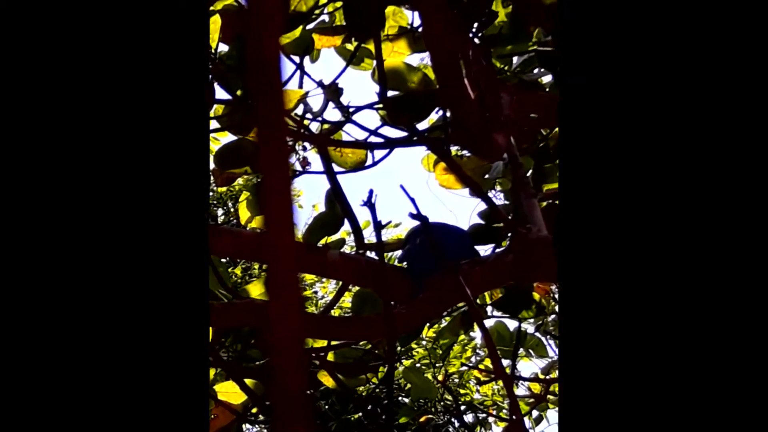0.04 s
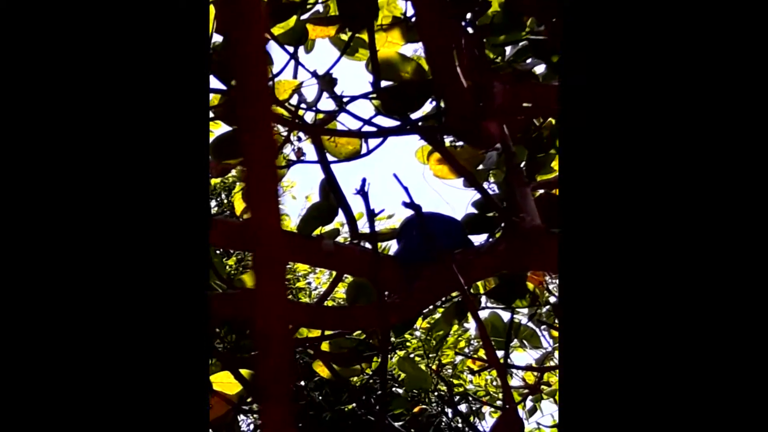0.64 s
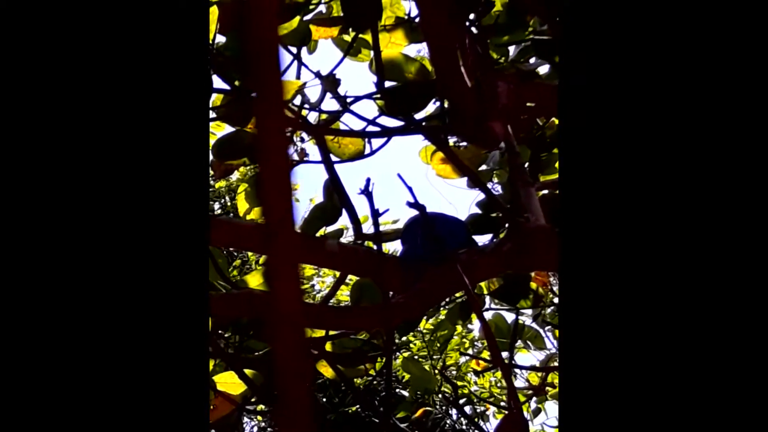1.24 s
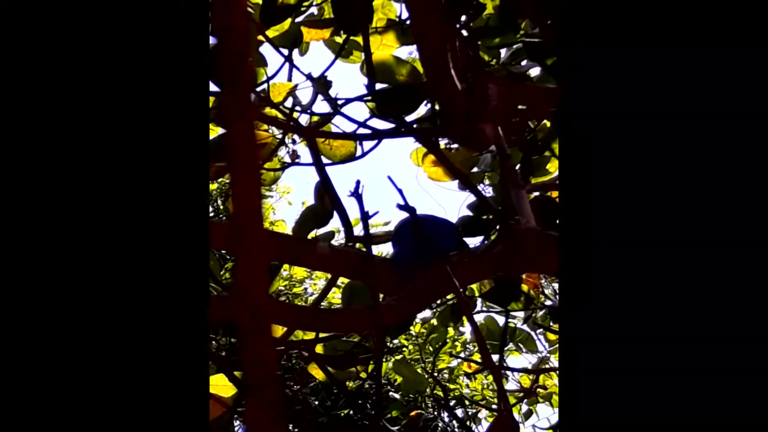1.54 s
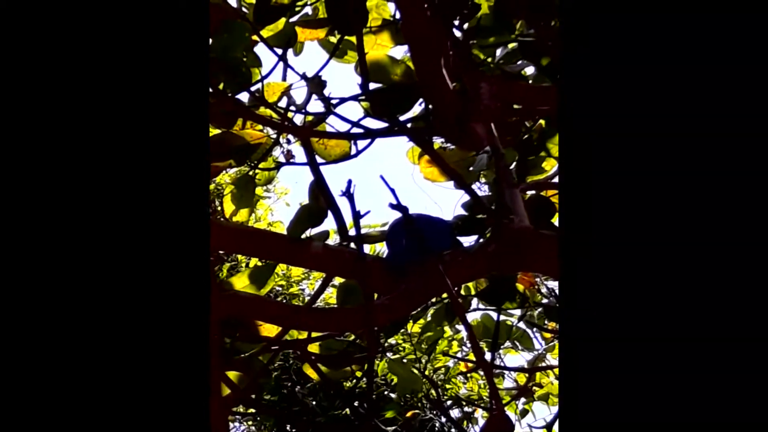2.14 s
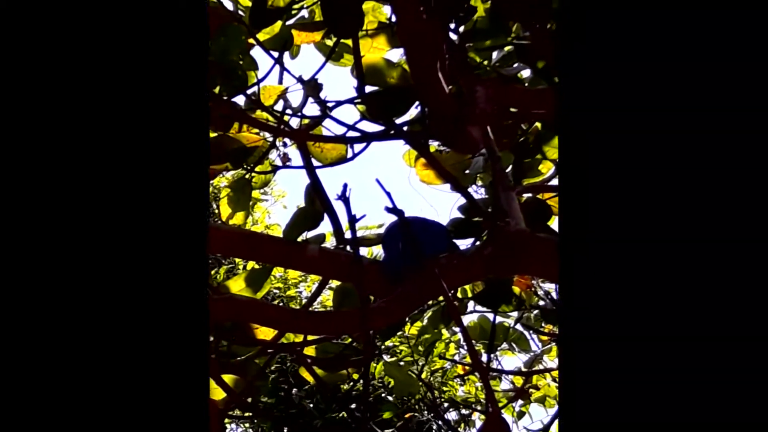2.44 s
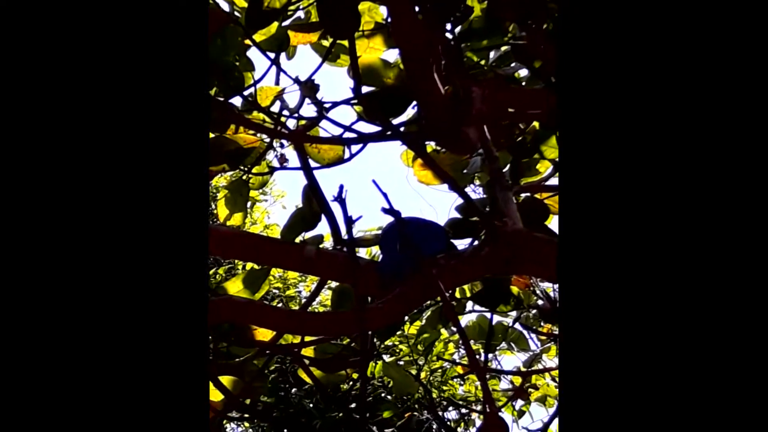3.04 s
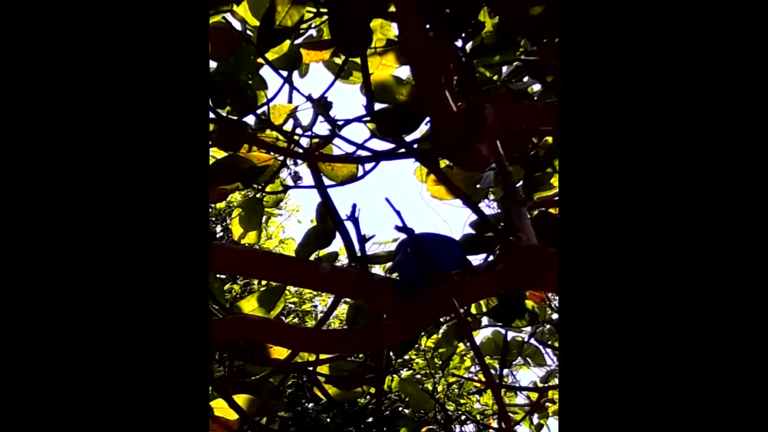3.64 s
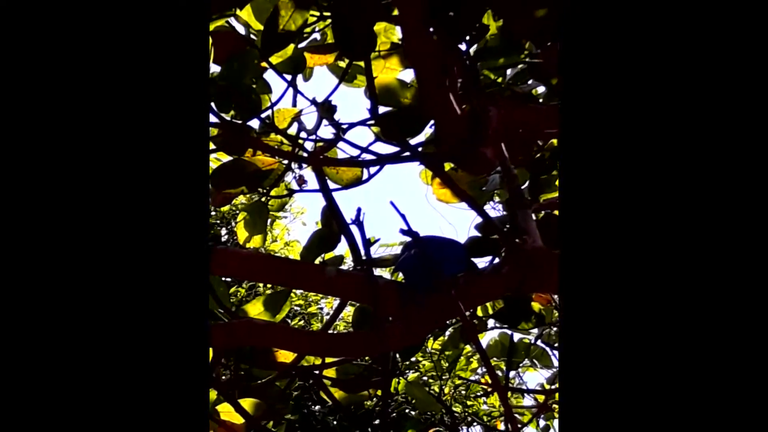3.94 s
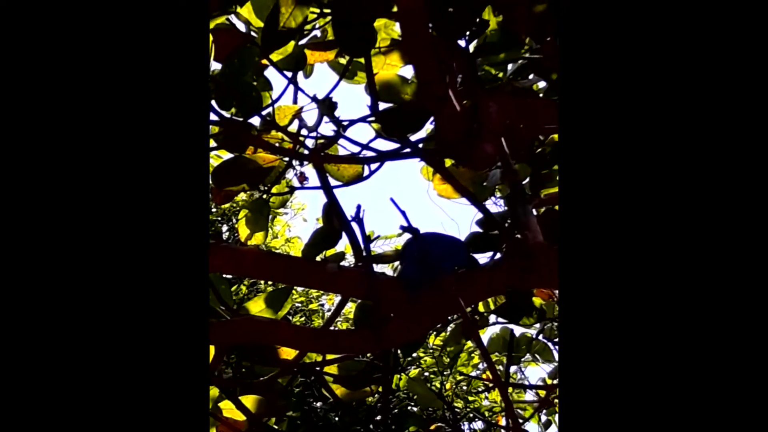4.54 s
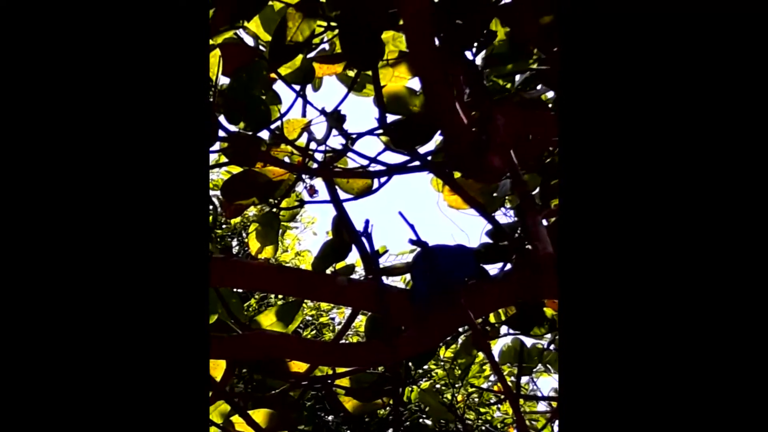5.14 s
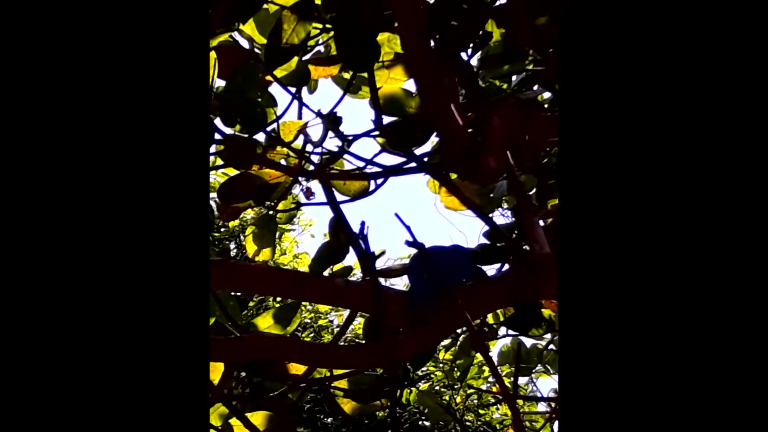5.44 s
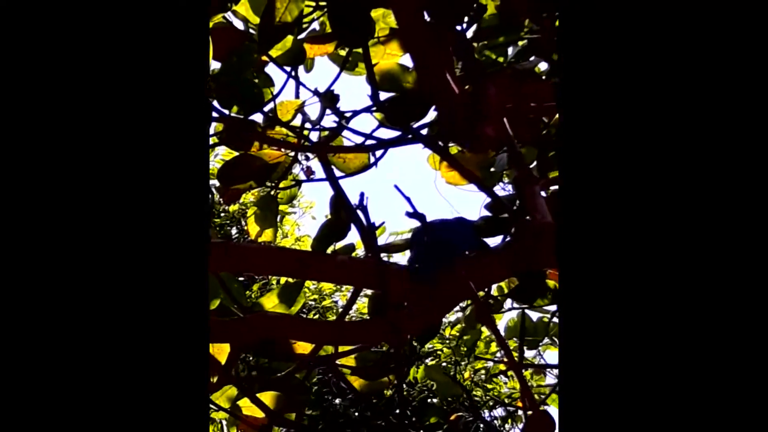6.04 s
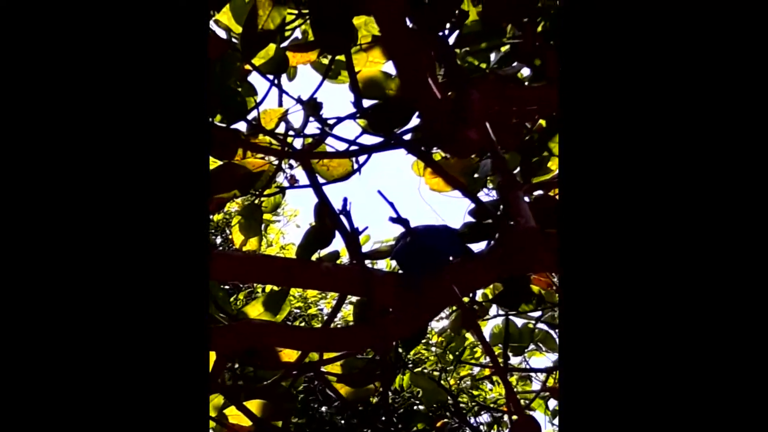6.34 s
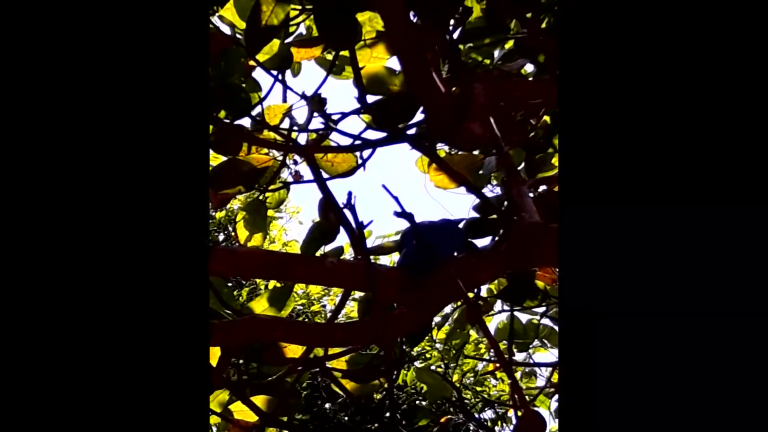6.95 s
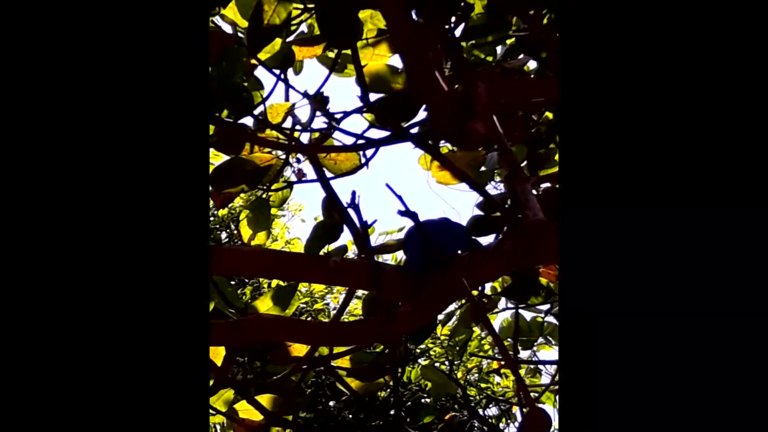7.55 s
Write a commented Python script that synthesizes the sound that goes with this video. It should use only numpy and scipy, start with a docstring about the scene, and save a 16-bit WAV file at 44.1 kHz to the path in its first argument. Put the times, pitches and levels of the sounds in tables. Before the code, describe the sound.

Under a tree, high insects throb steadily over a faint drone of far traffic. Small birds whistle in the distance, twigs tick and a nearer bird chirps briefly. Then a bird overhead gives two loud calls, each rising and dropping away, rich in overtones, slightly overloading the microphone and echoing through the wood. After the second call, a hoarse bird answers twice from farther off.

```python
"""Under a tree: far traffic drones and insects throb high up throughout. The echo of an earlier koel
call fades; small birds whistle far off. Twigs tick from 0.4 s, a bush cricket rasps from 1.2 s, and a
nearer bird slurs and chirps at 2.3 s. At 3.5 s and 6 s a koel overhead calls: its syrinx tone rises and
falls, overtones sweeping through the throat's resonances, overloads the microphone and echoes in the
wood. Around the second call a rumble swells, a hoarse bird answers twice, the nearer bird sings again."""
import sys
import numpy as np
from scipy import signal
from scipy.fft import rfft, irfft, next_fast_len
from scipy.io import wavfile
from scipy.ndimage import map_coordinates

SR = 44100
rng = np.random.default_rng(int(sys.argv[2]) if len(sys.argv) > 2 else 0)


def inscribe(sig):
    """Save sig as 16-bit PCM at rate SR to the path in sys.argv[1].

    A 1-D sig is mono; a 2-D sig holds one channel per row.
    Samples are clipped to [-1, 1] before scaling.
    """
    pcm = np.round(np.clip(np.atleast_2d(sig).T, -1, 1) * 32767)
    wavfile.write(sys.argv[1], SR, pcm.astype(np.int16))


N = 344421
T = np.arange(N) / SR
TOP_HZ = 15900


def amp(db):
    """Decibels to gain."""
    return 10 ** (np.asarray(db) / 20)


def unit(x):
    """x at rms 1."""
    return x / np.sqrt(np.mean(x ** 2) + 1e-20)


def along(points, hz):
    """(Hz, value) points read on a log axis."""
    f, v = np.transpose(points)
    return np.interp(np.log(hz + 1), np.log(f + 1), v)


def wobble(knots_per_s, t=T):
    """Smooth random curve over times t."""
    return map_coordinates(rng.standard_normal(int(N * knots_per_s / SR) + 4), [t * knots_per_s])


def filtered(x, response):
    """x through a gain given as a function of Hz."""
    size = next_fast_len(N + 8192)
    return irfft(rfft(x, size) * response(np.fft.rfftfreq(size, 1 / SR)), size)[:N]


def noise(spectrum):
    """Noise of rms 1 shaped by (Hz, dB) points."""
    return unit(filtered(rng.standard_normal(N), lambda hz: amp(along(spectrum, hz))))


def jitter(width_hz):
    """Random flutter of rms 1 below width_hz."""
    return unit(filtered(rng.standard_normal(N), lambda hz: 1 / (1 + (hz / width_hz) ** 4)))


def phase_of(hz):
    """Running phase of a moving pitch."""
    return 2 * np.pi * np.cumsum(hz) / SR


def swells(rows, edge):
    """Gain arching over each (start s, end s, dB) row; a smaller edge is squarer."""
    return sum(amp(db) * np.sin(np.pi * np.clip((T - start) / (end - start), 0, 1)) ** edge
               for start, end, db in rows)


def background(air_db=-40, firing_hz=65, firing_db=-52, octave_db=-55):
    """Hush of air and distant roads, a far engine's firing tone and octave, a low rumble that swells and fades."""
    # Each row: frequency in Hz, relative density in dB.
    air_spectrum = [(20, -27), (35, -13), (46, -6), (54, -10), (92, 1), (110, -4), (150, -5), (250, -10),
                    (800, -10), (1400, -14), (2500, -14), (3400, -20.5), (5800, -20.5), (8400, -31.5),
                    (10000, -33.5), (15800, -33.5)]
    rumble_spectrum = [(20, -16.5), (45, -3), (90, -5), (200, -16), (600, -38)]
    # Each row: start in seconds, end in seconds, level in dB.
    octave_swells = [(.45, 1.45, -47), (2.2, 2.52, -44.5)]
    rumble_swells = [(5.8, 7.4, -44.5)]
    phase = phase_of(firing_hz + 1.33 * wobble(5.4))
    firing_gain = amp(firing_db + wobble(3.5))
    octave_gain = amp(octave_db + wobble(3.5)) + swells(octave_swells, edge=0.19)
    drone = firing_gain * np.sin(phase) + octave_gain * np.sin(2 * phase)
    rumble = swells(rumble_swells, edge=1.01) * noise(rumble_spectrum)
    air = amp(air_db + 0.53 * wobble(3.49)) * noise(air_spectrum)
    return np.sqrt(2) * drone + rumble + air


def insects(chorus_db=-45.5, throb_hz=9.2, rasp_hz=60):
    """A throbbing chorus; above it, one bush cricket rasps in swelling phrases."""
    # Each row: frequency in Hz, relative density in dB.
    chorus_spectrum = [(4500, -55), (6000, -14), (6550, -5.5), (6900, 1), (7300, 1.5), (7700, -9.5),
                       (8200, -19), (9500, -58)]
    cricket_spectrum = [(8000, -40), (8700, -7), (8980, -3), (9070, 5.5), (9150, -2.5), (9300, -9),
                        (9600, -43)]
    # Each row: start in seconds, end in seconds, level in dB.
    phrases = [(1.2, 1.5, -64), (1.62, 1.88, -65), (1.98, 2.27, -59), (2.33, 2.645, -55.5),
               (2.72, 3.05, -55.5), (3.13, 3.473, -55), (4.06, 4.657, -55), (4.65, 4.955, -58.5)]
    throb_db = 1.7 * np.sin(phase_of(throb_hz + 0.25 * wobble(2)))
    chorus = amp(chorus_db + throb_db + 0.47 * wobble(30)) * noise(chorus_spectrum)
    rasp_db = 1.8 * np.sin(phase_of(rasp_hz + 3 * wobble(5.5)))
    cricket = swells(phrases, edge=0.3) * amp(rasp_db) * noise(cricket_spectrum)
    return chorus + cricket


def echo(x, near_t60_s, far_db):
    """Near leaves and branches scatter a quick dense answer; far trunks add a longer tail."""
    # Each row: frequency in Hz, t60 of the far tail in seconds.
    wood_t60 = [(300, 3), (950, 0.13), (1220, 1.72), (1700, 1.36), (4000, 0.38), (6000, 0.67), (9000, 0.21),
                (15000, 0.24)]
    hz, t, spectra = signal.stft(rng.standard_normal(SR), SR, nperseg=256)
    decay = amp(-60 * t / near_t60_s) + amp(far_db - 60 * t / along(wood_t60, hz)[:, None])
    build_up = 1 - np.exp(-t / 0.0051)
    tail = signal.istft(spectra * decay * build_up, SR, nperseg=256)[1]
    return signal.fftconvolve(x, tail / np.linalg.norm(tail))[:N]


def note(start_s, length_s, pitches_hz, scatter):
    """Sample indices, phase and arched envelope of a glide through three pitches."""
    at = np.flatnonzero((T > start_s) & (T < start_s + length_s))
    progress = (T[at] - start_s) / length_s
    hz = np.polyval(np.polyfit([0, 0.5, 1], pitches_hz, 2), progress)
    arch = np.sqrt(2 * np.abs(np.sin(np.pi * progress)))
    return at, phase_of(hz * (1 + scatter[at])), arch


def sing(songs, notes, octave_db):
    """Repeated song of whistles with a weak octave; returns direct sound and echo feed."""
    direct, scattered, waver = np.zeros(N), np.zeros(N), jitter(270)
    for start_s, pitch_factor, song_db, song_echo_db in songs:
        for delay_s, length_s, *pitches_hz, db, scatter, echo_db in notes:
            hz = pitch_factor * np.array(pitches_hz)
            at, phase, arch = note(start_s + delay_s, length_s, hz, scatter * waver)
            whistle = amp(song_db + db) * arch * (np.sin(phase) + amp(octave_db) * np.sin(2 * phase))
            direct[at] += whistle
            scattered[at] += amp(song_echo_db + echo_db) * whistle
    return direct, scattered


def far_calls(lone_scatter=0.045):
    """The fading echo of an earlier koel call, faint lone whistles and a far song, smeared by the wood."""
    # Each row: start in seconds, pitch factor, level in dB, echo in dB.
    songs = [(-.115, 1.102, -41, 2.5), (2.087, 0.997, -36.5, 0), (4.692, 1.06, -42.5, 5.5)]
    # Each row: delay and length in seconds, first, middle and last pitch in Hz before the factor,
    # relative level in dB, pitch scatter as a fraction, echo in dB.
    notes = [(0, .068, 1580, 1360, 1170, -6, .11, 0), (.075, 0.128, 2310, 2355, 2390, 0, .052, -1)]
    # The koel's echo (near 1200 Hz) and the whistles.
    # Each row: start and length in seconds, first, middle and last pitch in Hz, level in dB.
    lone_tones = [(0, 0.073, 3170, 3400, 3400, -47.5), (0, 0.14, 1205, 1190, 1187, -47),
                  (0, .12, 4510, 4610, 4600, -53), (4.84, .103, 4550, 4620, 4650, -51),
                  (4.98, .16, 5400, 5600, 5750, -53)]
    direct, scattered = sing(songs, notes, octave_db=-22)
    lone, waver = np.zeros(N), jitter(260)
    for start_s, length_s, *pitches_hz, db in lone_tones:
        at, phase, arch = note(start_s, length_s, pitches_hz, lone_scatter * waver)
        lone[at] += amp(db) * arch * np.sin(phase)
    return direct + lone + echo(scattered + lone, near_t60_s=0.91, far_db=0.5)


def twigs(crack_db=-18, crack_t60_s=0.01):
    """Each twig gives a broad crack and a brief woody knock."""
    # Each row: start in seconds, level in dB, knock centre in Hz, knock t60 in seconds.
    ticks = [(0.427, -41, 6840, .04), (1.228, -26, 1650, 0.03), (2.707, -33, 2570, 0.016),
             (2.816, -35.5, 1900, .04), (4.997, -28.5, 3330, 0.019), (7.63, -34, 1310, .02)]
    direct, t = np.zeros(N + SR), np.arange(SR // 8) / SR
    for start_s, db, hz, t60_s in ticks:
        burst = rng.standard_normal(len(t))
        wood = signal.iirpeak(hz, Q=1, fs=SR)
        knock = amp(-60 * t / t60_s) * unit(signal.lfilter(*wood, signal.lfilter(*wood, burst)))
        crack = amp(crack_db - 60 * t / crack_t60_s) * burst
        direct[round(start_s * SR):][:len(t)] += amp(db) * (knock + crack)
    return direct[:N] + amp(-11.5) * echo(direct[:N], near_t60_s=0.25, far_db=-17)


def near_bird():
    """A falling slur and a rising chirp, echoed by the leaves."""
    # Columns as in far_calls.
    songs = [(2.284, 1.001, -24, -3.5), (6.858, 1.005, -32, 1.5)]
    notes = [(0, 0.053, 2217, 1905, 1770, -16.5, .01, -5.5), (.09, .033, 3050, 3880, 4090, 0, .012, 1)]
    direct, scattered = sing(songs, notes, octave_db=-30)
    return direct + echo(scattered, near_t60_s=0.11, far_db=-1.5)


def koel_pitch(age_s, low_hz, crest_hz, bend, fall_from_s, fall_hz_per_s):
    """Pitch in Hz: drops from a sharp start, climbs to the crest, holds, turns into a steady fall."""
    rise_from_s, crest_s, turn_s = 0.067, 0.305, 0.008
    sharp_hz = 91.2 * np.exp(-age_s / 0.01834)
    climb = np.clip((age_s - rise_from_s) / (crest_s - rise_from_s), 0, 1) ** bend
    falling_s = turn_s * np.logaddexp(0, (age_s - fall_from_s) / turn_s)
    return low_hz + sharp_hz + (crest_hz - low_hz) * climb - fall_hz_per_s * falling_s


def koel_overtones(age_s, pitch_hz, phase, opening):
    """Harmonics 2-15 sweep through the resonances of throat and bill, each flickering on its own."""
    # Each row: frequency in Hz, gain in dB.
    throat = [(1500, -28.5), (2200, -11.5), (2900, -17.5), (3600, -17), (4300, -21.5), (5060, -16.5),
              (5190, 3), (6100, -4.5), (7300, -5), (8050, -20.5), (8700, -2.5), (9700, -33), (10900, -18),
              (11700, -26), (13000, -14), (14200, -32), (15500, -31.5)]
    tilt_db = 10 * (0.5 - opening)  # the top grows as the opening passes
    flicker_db = [2.8 * wobble(54.1, age_s) + 1.6 * wobble(13.5, age_s) for _ in range(16)]
    overtones = np.zeros(len(age_s))
    for k in range(2, 16):
        hz = k * pitch_hz
        db = along(throat, hz) + tilt_db * (hz / TOP_HZ) ** 2 + flicker_db[k]
        overtones += amp(db) * (hz < TOP_HZ) * np.sin(k * phase)
    return overtones


def koel(second_voice_hz=1287, settle_s=0.031, opening_s=0.17, fall_from_s=0.353):
    """The syrinx starts with a rasp, its two sides out of step, then settles into one strong tone."""
    # Each row: start in seconds, low and crest pitch in Hz, power of the rise, fall in Hz per second,
    # gain in dB, extra overtone gain in dB throughout and in the opening.
    calls = [(3.490, 989.6, 1198, 1.22, 4285, -1.5, 0, -1.5), (6.003, 1076, 1255, 1.8, 4784, 0.5, 0.5, 2)]
    # Each row: call age in seconds, fundamental in dB, overtones in dB, roughness.
    effort = [(0, -39, -66, 0.95), (0.02, -14, -40.5, 1.11), (.045, -8.5, -33.5, 0.42),
              (.16, -6, -30, 0.24), (.24, -7.5, -26.5, 0.42), (.32, -4, -23, 0.7), (.388, -6, -29.5, .75),
              (.438, -22.5, -44.5, 0.63), (.487, -35, -65, .9)]
    # The voice catches. Each row: time in seconds, half length in seconds, added roughness.
    catches = [(3.61, 0.01, 1), (3.759, 0.014, 0.44), (3.866, 0.0084, 0.36), (6.226, .018, 0.55),
               (6.384, 0.015, .7)]
    # Branch reflections cancel or boost the tone. Each row: pitch in Hz, half width in Hz, gain in dB.
    branch_bands = [(986, 20, -12.5), (1054, 12.1, 1.5), (1092.1, 11.3, -19), (1159, 18, 2),
                    (1193.5, 12.6, -5.5), (1235, 9.2, -15.5), (1256, 10, 2.5)]
    voice = np.zeros(N)
    shake, flutter, grit = jitter(87.8), jitter(397), jitter(394)
    catch = sum(extra * np.exp(-((T - s) / half_s) ** 2) for s, half_s, extra in catches)
    knots_s, *curves = np.transpose(effort)
    length_s = knots_s[-1]
    for start_s, low_hz, crest_hz, bend, fall_hz_per_s, db, extra_db, opening_db in calls:
        at = np.flatnonzero((T > start_s) & (T < start_s + length_s))
        age_s = T[at] - start_s
        tone_db, overtone_db, strain = [np.interp(age_s, knots_s, curve) for curve in curves]
        rough = strain + catch[at]
        unsettled = np.exp(-(age_s / settle_s) ** 4)
        opening = np.exp(-(age_s / opening_s) ** 2)
        fallen = np.clip((age_s - fall_from_s) / (length_s - fall_from_s), 0, 1)

        pitch_hz = koel_pitch(age_s, low_hz, crest_hz, bend, fall_from_s, fall_hz_per_s)
        tremor = 0.01107 * rough + 0.03 * fallen
        phase = phase_of(pitch_hz * (1 + tremor * shake[at]))
        tone = np.sin(phase) * (1 + 0.12 * rough * flutter[at])
        tone += 0.59 * unsettled * (1.1 + grit[at]) * np.sin(2 * np.pi * second_voice_hz * age_s)
        branch_db = sum(gain_db * np.exp(-((pitch_hz - hz) / half_hz) ** 2)
                        for hz, half_hz, gain_db in branch_bands)
        tone *= amp(tone_db + branch_db)

        overtones = koel_overtones(age_s, pitch_hz, phase, opening)
        overtones *= 1 + 0.36 * rough * flutter[at]
        overtones *= amp(overtone_db + extra_db + opening_db * opening)
        early_octave = amp(-34) * (1 - unsettled) * np.exp(-(age_s / 0.091) ** 2) * np.sin(2 * phase)
        voice[at] += np.sqrt(2) * amp(db) * (tone + overtones + early_octave)
    # Leaves throw back the middle overtones best. Each row: frequency in Hz, gain in dB.
    leaves = [(700, -2.5), (1040, -9), (1220, -5.5), (5800, -2.5), (12000, -6)]
    reflected = echo(voice, near_t60_s=0.38, far_db=-23)
    return voice + filtered(reflected, lambda hz: amp(along(leaves, hz)))


def hoarse_bird(scatter=0.0634, rasp=0.83, undertone_db=-17):
    """Far echoing cries, each growing rougher, with a weak tone an octave below."""
    # Each row: start and length in seconds, first, middle and last pitch in Hz, relative level in dB.
    cries = [(6.386, .2, 1450, 1580, 1651, -23.5), (6.949, 0.258, 1432, 1515, 1525, -24.5)]
    direct, waver, flutter = np.zeros(N), jitter(177), jitter(455)
    for start_s, length_s, *pitches_hz, db in cries:
        rough = np.clip(0.31 + 1.458 * ((T - start_s) / length_s) ** 2, 0, 2)
        at, phase, arch = note(start_s, length_s, pitches_hz, scatter * rough * waver)
        undertone = amp(undertone_db) * np.sin(phase / 2) * (0.5 + waver[at])
        envelope = arch ** 2 * (1 + rasp * rough[at] * flutter[at])
        direct[at] += amp(db) * envelope * (np.sin(phase) + undertone)
    return amp(-4.5) * (direct + echo(direct, near_t60_s=0.49, far_db=-14))


def scene():
    """Everything heard under the tree, in mono."""
    return (background() + insects() + far_calls() + twigs() + near_bird() + koel() + hoarse_bird())[None]


def record(dry):
    """The microphone overloads: peaks flatten at full scale; all above TOP_HZ is cut."""
    hardness = 26
    clipped = dry[0] / (1 + np.abs(dry[0]) ** hardness) ** (1 / hardness)
    return filtered(clipped, lambda hz: hz < TOP_HZ)[None]


dry = scene()
out = record(dry)
inscribe(out)
```